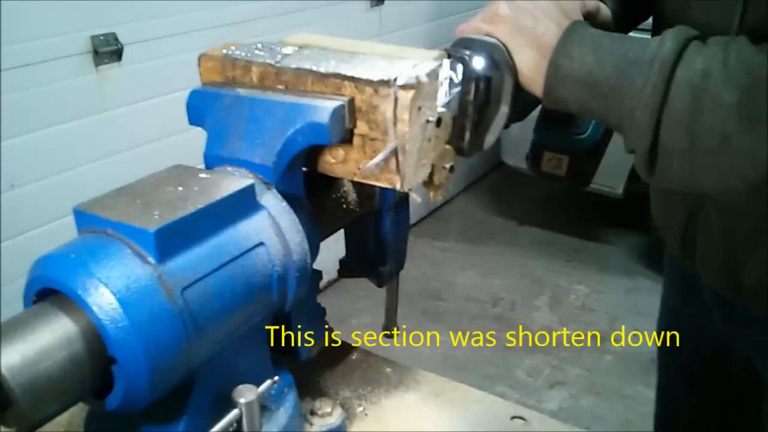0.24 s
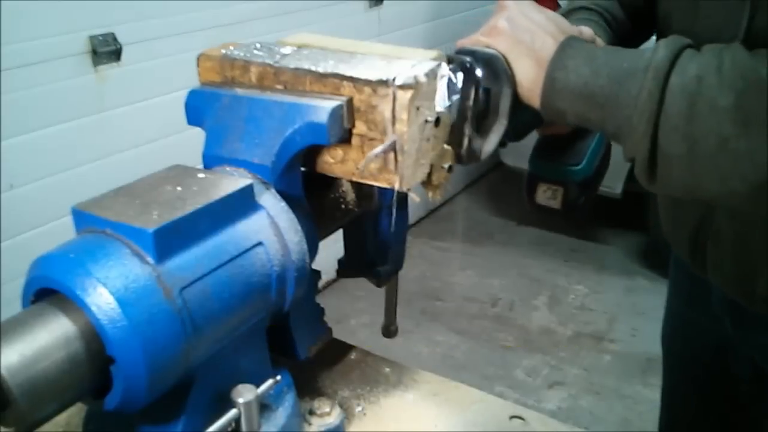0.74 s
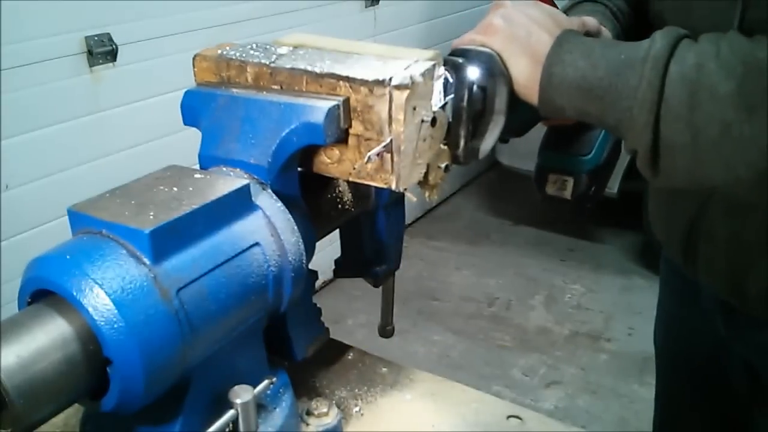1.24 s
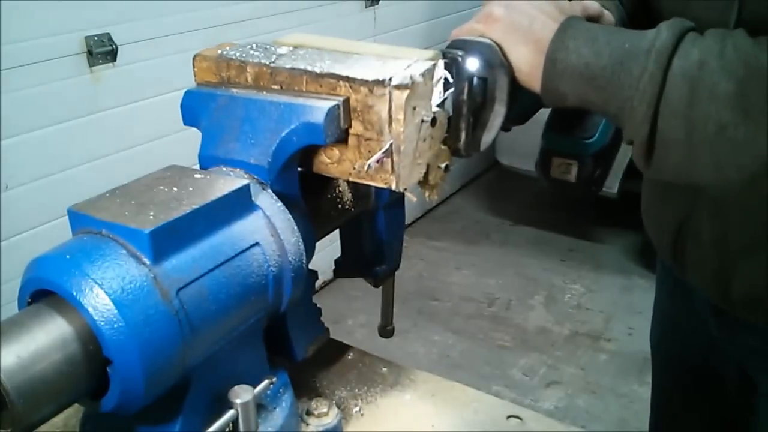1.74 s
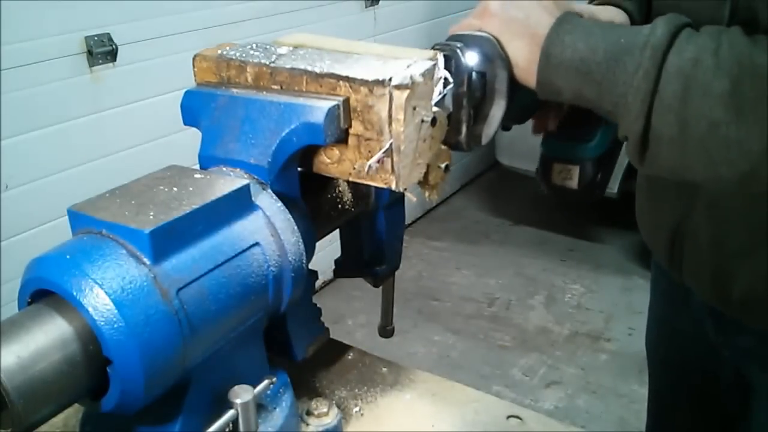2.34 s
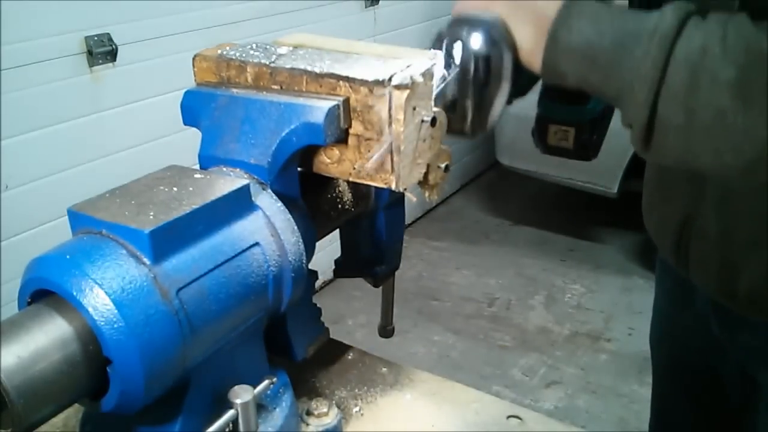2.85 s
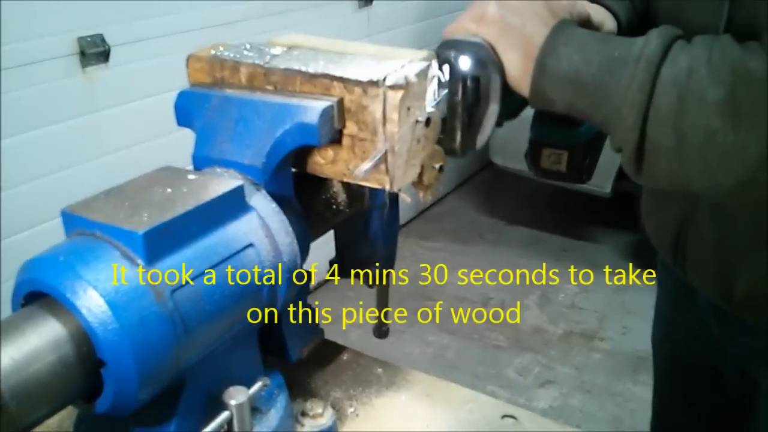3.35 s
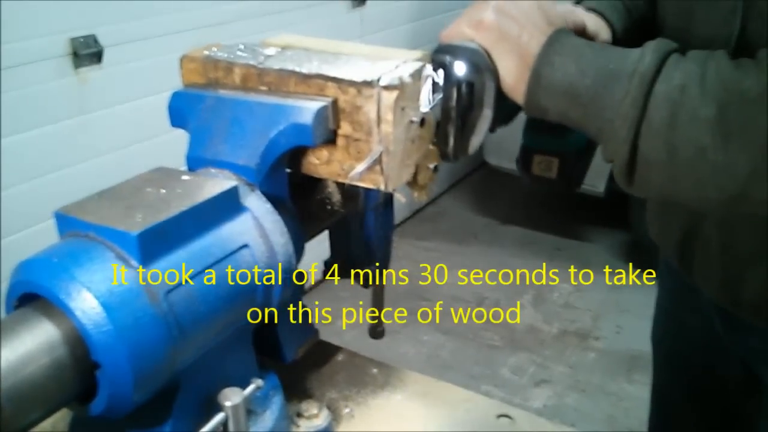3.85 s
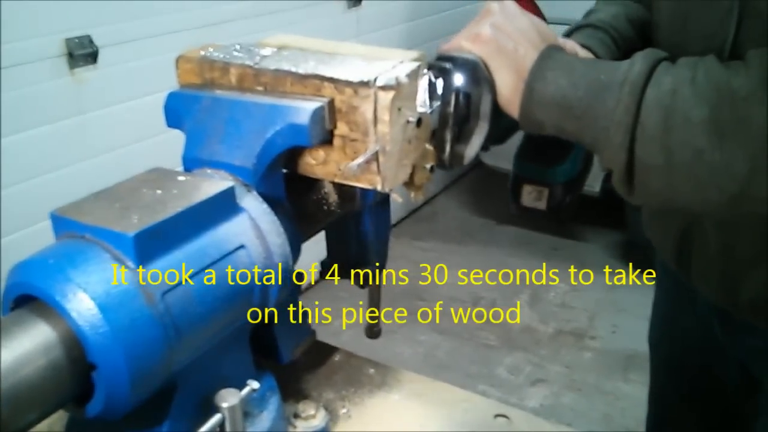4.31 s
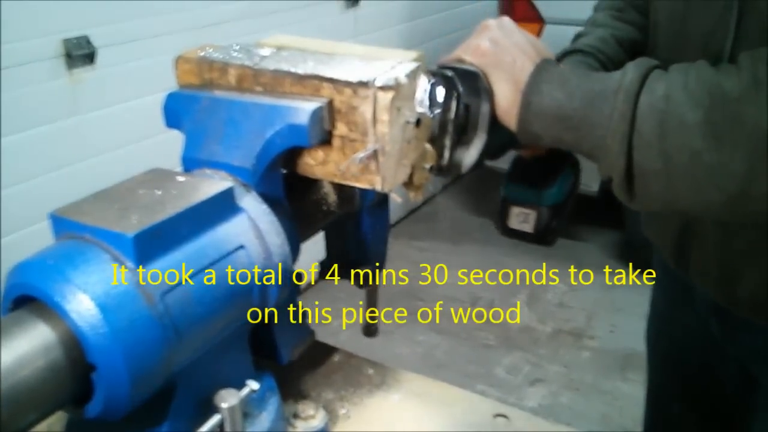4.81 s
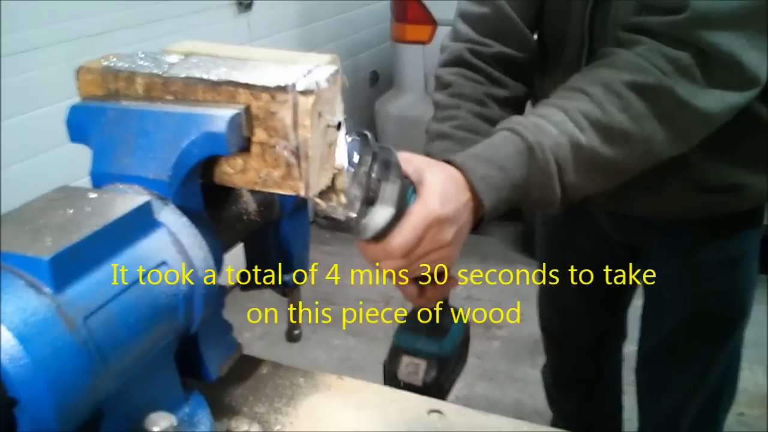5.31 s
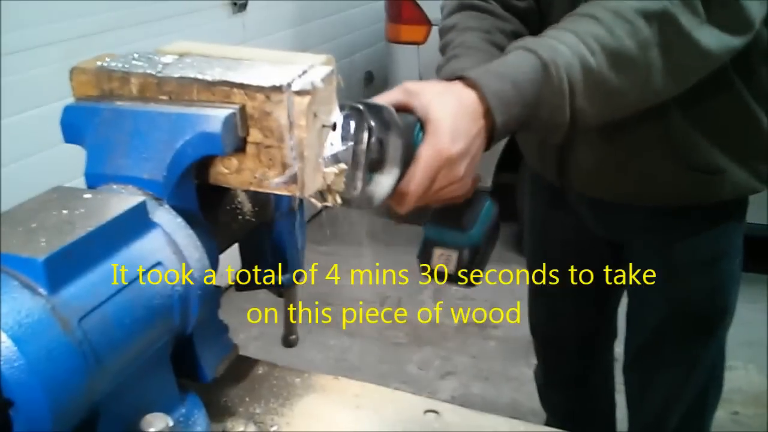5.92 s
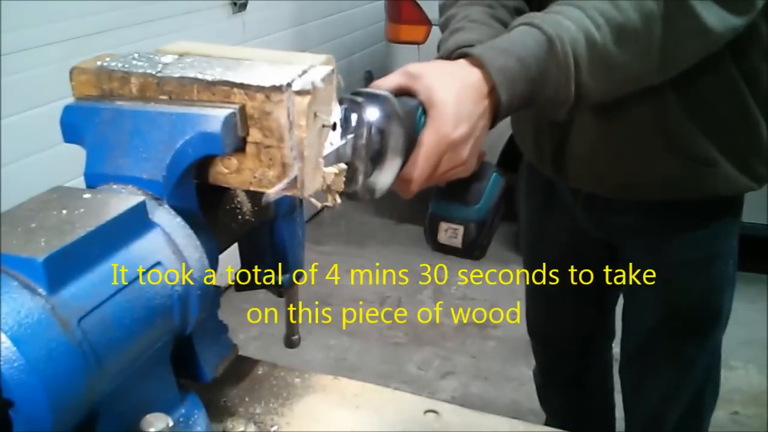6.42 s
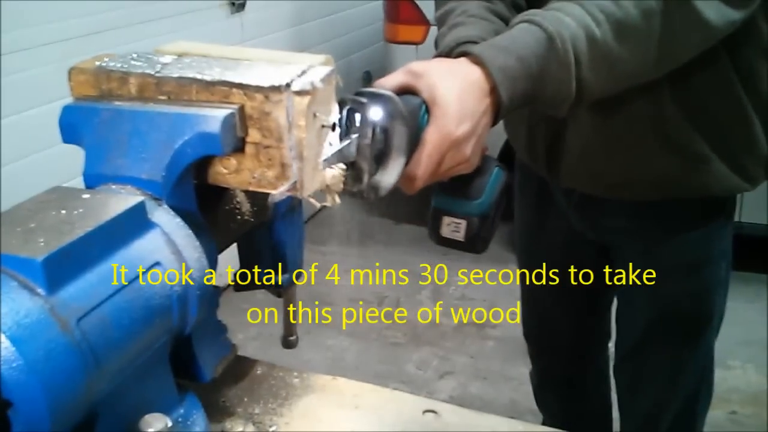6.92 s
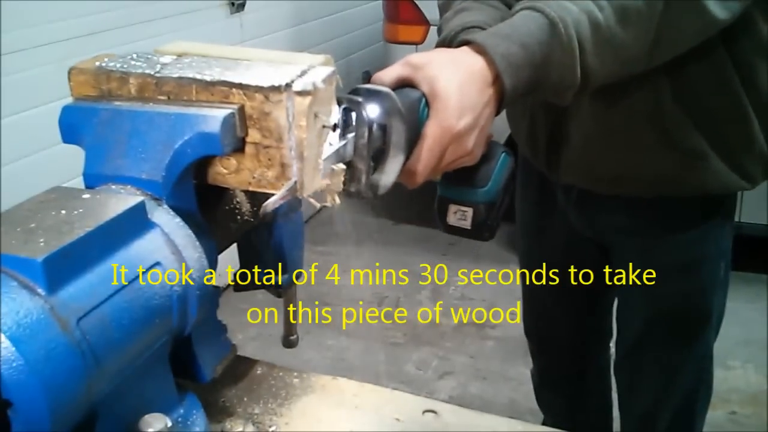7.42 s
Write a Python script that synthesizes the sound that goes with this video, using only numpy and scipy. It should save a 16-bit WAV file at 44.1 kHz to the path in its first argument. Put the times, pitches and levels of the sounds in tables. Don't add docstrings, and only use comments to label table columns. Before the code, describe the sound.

Already running, a power saw rasps wood and thumps the bench, bogs down and bangs to a stop. A short steely ring fades into quiet shop air with scattered small knocks, then harder clunks. The saw restarts abruptly and grinds to the end, straining and recovering, its blade squealing thinly on nails. Sound is dense, distorted and squashed flat, heard from the bench top with short room echoes.

```python
import sys
import numpy as np
from scipy import signal
from scipy.fft import rfft, irfft
from scipy.io import wavfile
from scipy.ndimage import uniform_filter1d, minimum_filter1d

SR = 44100
rng = np.random.default_rng(int(sys.argv[2]) if len(sys.argv) > 2 else 0)


def field_ratio(decibels):
    return 10 ** (np.asarray(decibels, dtype=float) / 20)


def dump_mix(stems):
    frames = np.atleast_2d(stems).T
    limited = np.clip(frames, -1, 1)
    pcm = np.round(limited * 32767).astype(np.int16)
    wavfile.write(sys.argv[1], SR, pcm)


N = 337806
JAM_S = 1.122

# time in seconds, speed in strokes per second.
SPEED = [
    [(0.0, 31.6), (0.49, 30), (0.84, 28), (1.1, 27.7)],
    [(3.06, 33.7), (3.44, 34.1), (3.69, 31.0), (4.06, 30.5), (4.26, 33.7), (4.76, 26.8), (5.17, 30.7),
     (5.72, 24.5), (5.95, 26.2), (6.27, 35.3), (6.51, 34.8), (6.78, 28.4), (6.96, 32.8), (7.65, 34.3)],
]
CRANK_STARTS = (.1, 55.0)
# time in seconds, pressure in dB, steel against wood in dB,
# share gated by the stroke from 0 to 1.
FEED = [
    [(0.0, -8.5, -15.5, 0.15), (.37, -15, -19.5, 0.5), (.6, -11.5, -18, 0.1), (.84, -12.5, -20.5, 0.4),
     (.95, -6, -18.5, 0.5), (1.066, -18, -8.5, 0.4)],
    [(2.69, -26, -8.5, .1), (3.0, -20, -8, 0.4), (3.15, 0.5, -10, 0.2), (3.4, -12.5, -12, 0.05),
     (4.25, -13, -10.5, 0.2), (4.55, -14.5, -12, 0.04), (5.15, -12.5, -5.5, 0.3), (5.9, -9.5, -7, 0.2),
     (6.1, -17, -20.5, 0.1), (6.5, -18.5, -16.5, .45), (7.15, -15, -16.5, .8), (7.65, -21, -12.5, 0.6)],
]
# frequency in Hz, level in dB per Hz.
TOP_CUT = [(130, -39), (230, -9.5), (681, -11), (907, -4), (1470, -13), (3550, -34), (7530, -16.5),
           (16000, -39)]
BOGGED_CUT = [(130, -36), (250, -5.5), (550, -14), (1090, -8), (1190, -13), (3180, -31.5), (7530, -20),
              (16000, -36)]
FRESH_CUT = [(130, -35), (220, -3.5), (706, -7.5), (907, 1), (1580, -4.5), (2350, -12.5), (7400, -1.5),
             (16000, -22)]
NAILED_CUT = [(130, -33), (220, -4.5), (693, -18.5), (924, -10), (2810, -25), (4170, -16.5), (6070, -19.5),
              (16000, -34.5)]
LOW_CUT = [(130, -45), (330, -20), (900, -6.5), (1420, -14), (2810, -31), (5600, -27.5), (7400, -23),
           (16000, -44.5)]
LAST_CUT = [(130, -43), (220, -19), (569, -2.5), (907, 3), (1400, -8.5), (2810, -25), (8540, -17),
            (16000, -38.5)]
# start in seconds, steel tick at the bite in dB,
# tick at the return in dB, colour of the cut.
POSITIONS = [
    (0, -18, 4.5, TOP_CUT),
    (.52, -23, -1.5, BOGGED_CUT),
    (2, -3.5, -26.5, FRESH_CUT),
    (4.7, -29, -21.5, NAILED_CUT),
    (5.998, -4.5, -4.5, LOW_CUT),
    (7.0, 6, -16.5, LAST_CUT),
    (7.52, 13.5, -5.5, LAST_CUT),
]
# level in dB, one a position.
FIZZ_DB = [10.6, 8, 0.87, 1.2, 4.1, 5.5, 8]
# frequency in Hz, width in Hz, level in dB.
WOOD = [(434, 29, -13), (585.6, 24, 4.5), (836.5, 79, -13.5), (1020, 64, -21), (1300, 24, -41),
        (1640, 110, 3), (2510, 76, -5.5), (4220, 150, -1.5)]
# level in dB, one a position.
PLATE_DB = [-30, -30, -30, -17, -7, -17, -19]
# frequency in Hz, width in Hz.
BENCH = [(63, 6.1), (96, 20), (138, 26), (176, 41)]
BRACING = [(-46.5, -15.5, -31, -19.5), (-34, -16.5, -13.5, -17), (-18, -18.5, -13.5, -18.5),
           (-14.5, -20.5, -17.5, -19), (-23.5, -22, -21, -24.5), (-32.5, -17.5, -30.5, -22),
           (-30, -22.5, -31, -21.5)]
# time in seconds, strength in dB,
# part of the bench leaned on in octaves above its second mode.
SHOVE = [
    [(0.0, 1.5, 0.015), (.6, -1, 0.46), (.84, 3, .52), (1.088, 3, 0.27)],
    [(3.0, -18.5, .01), (3.12, 3, 0.44), (3.6, -1.2, .1), (4.25, -2, 0.46), (4.45, -1.5, .2), (5.0, 2, .6),
     (5.15, -8, 0.87), (5.5, 1.5, -0.28), (5.62, 4.5, .2), (5.95, 11, 0.039), (6.4, -11, -.1),
     (6.75, 1.5, .52), (7.1, -9.5, 0.97), (7.65, -2, .1)],
]
# frequency in Hz, level in dB per Hz.
FLOOR = [(18, -44.5), (30, -11), (108, 0.5), (239, -10), (337, -18.5), (596, -14), (878, -32),
         (1290, -19.5), (3450, -37.5), (7000, -32.5), (9100, -66), (15400, -120)]
# frequency in Hz, t60 in seconds.
SHOP = [(100, 0.38), (500, 0.4), (2000, 0.3), (6000, 0.31), (12000, 0.28)]
# start in seconds, length in seconds, lower and upper blade ring in dB.
NAILS = [(.125, 0.13, -29.5, -31.5), (.87, 0.1, -29, -22), (1.085, .02, -27, -29),
         (3.05, 0.22, -32.5, -23.5), (4.22, 0.19, -20.5, -25), (4.551, 0.13, -31.5, -38),
         (4.76, 0.17, -21.5, -21), (5.04, 0.041, -12.5, -17.5), (5.14, 0.32, -14, -21),
         (5.3, .29, -10, -14.5), (5.75, .16, -14.5, -17.5), (6.94, 0.027, -17, -28.5)]
IDLE_RING_DB = (-41.5, -51.5)
# frequency in Hz, width in Hz, level in dB.
PAIRS = [
    [(6089, 16, 0), (6136, 16, -1)],
    [(9880, 22, 0), (10700, 20, -14)],
]
FREE_HZ = [6089, 6136, 9889, 10700, 14380]
# level in dB, t60 in seconds.
FREE_BLADE = [(-22, .3), (-15, .3), (-22, .19), (-22, .14), (-27, .13)]
# time in seconds, peak in dB, ring in Hz,
# bass above the peak in dB, looseness in dB.
KNOCKS = [(1.122, -2.5, 927, -11, -8), (1.414, -33, 427, -3, -37), (1.492, -41.5, 2040, 6, -26),
          (1.515, -33.5, 517, 2, -24.5), (1.549, -44.5, 5470, 9, -1.5), (1.583, -41, 566, 14, -3.5),
          (1.666, -11.5, 1640, 0, -19), (1.708, -24, 1170, -5, -6), (1.819, -35.5, 990, -18, -1.5),
          (1.866, -34, 1725, -29, -10.5), (2.131, -51, 1920, -9.5, -8.5), (2.167, -54, 473, -11.5, -21.5),
          (2.236, -37, 604, -18, -11.5), (2.263, -33, 557, -7, -30), (2.309, -48, 610, 0, -11),
          (2.35, -35.5, 587, -8.5, -10), (2.558, -40, 1720, -29, -8), (2.607, -45, 592, -18.5, -7),
          (2.671, -46.5, 550, 8, -3.5), (2.726, -12.5, 1140, -10, -7.5), (2.852, -0.5, 870, -10, -6.5),
          (2.872, -10, 910, 11, -22.5), (3.059, -0.5, 880, -10, -0.5)]


def evened(x):
    return x / np.sqrt(np.mean(x ** 2) + 1e-20)


def read(points, hz):
    f, value = np.transpose(points)
    return np.interp(np.log(hz + 1), np.log(f + 1), value)


def curves(tables, t):
    s, *columns = np.transpose(sum(map(list, tables), []))
    running = (t <= tables[0][-1][0]) | (t >= tables[1][0][0])
    return [np.interp(t, s, c) for c in columns], 1. * running


def wander(t, pace_s, count):
    rows = rng.standard_normal((count, 300))
    return np.array([np.interp(t / pace_s, np.arange(300), row) for row in rows])


def position(t):
    return np.searchsorted([row[0] for row in POSITIONS], t, "right") - 1


def resonate(x, hz, width):
    turn = np.exp(2j * np.pi * np.cumsum(hz * np.ones(len(x))) / SR)
    r = np.exp(-np.pi * width / SR)
    return 2 * (turn * signal.lfilter([1 - r], [1, -r], x / turn)).real


def steep(x, hz, width):
    return evened(resonate(resonate(x, hz, width), hz, width))


def modes(x, table):
    return sum((-1) ** k * field_ratio(db) * resonate(x, hz, width) for k, (hz, width, db) in enumerate(table))


def clicks(per_s, spread_db):
    size = field_ratio(spread_db * np.minimum(rng.exponential(1, N), 5)) * rng.choice([-1., 1.], N)
    return evened(size * (rng.random(N) < per_s / SR))


def blows(turns, at, uneven_db):
    passed = np.diff(np.floor(turns - at), prepend=-1).clip(0, 1)
    return evened(passed * field_ratio(uneven_db * rng.standard_normal(N)))


def stroke_turns():
    snag, snag_s = .025, .06
    creep_per_s = 9.9
    t = np.arange(N) / SR
    restart_s = SPEED[1][0][0]
    (speed,), running = curves(SPEED, t)
    speed = speed * (1 + snag * wander(t, snag_s, count=1)[0] * (t > restart_s))
    turns = np.cumsum(np.where(running > 0, speed, creep_per_s)) / SR
    second = t > SPEED[0][-1][0]
    return turns + np.where(second, CRANK_STARTS[1] - turns[round(restart_s * SR)], CRANK_STARTS[0])


def rasp_levels(t):
    spin_up_db, spin_up_s = -53, 0.013
    fizz_lag_db, fizz_lag_s = -23, .04
    first_steel_s, before_steel_db = .115, -21
    nail_fizz = 0.084
    (pressure, steel, _), running = curves(FEED, t)
    from_restart = abs(t - FEED[1][0][0])
    pressure = pressure + spin_up_db * np.exp(-from_restart / spin_up_s)
    fizz = np.array(FIZZ_DB)[position(t)] + before_steel_db * (t < first_steel_s)
    fizz += nail_fizz * (nails(t)[1] - IDLE_RING_DB[1])
    fizz += fizz_lag_db * np.exp(-from_restart / fizz_lag_s)
    return [pressure, pressure + steel, pressure + steel + fizz], running


def wood_body(wood, gated, turns, bite):
    knock = 0.65 * gated * blows(turns, at=bite + .08, uneven_db=5)
    body = modes(wood + knock, WOOD)
    shoe_slap = steep(blows(turns, at=bite + .04, uneven_db=4.5), 1423, 240)
    block_rock = steep(blows(turns, at=bite + .2, uneven_db=4.5), 920, 220)
    return body + 0.2 * gated * shoe_slap + 0.15 * gated * block_rock


def cut_colour(layers, over_db=3.0):
    hz, t, z = signal.stft(layers, SR, nperseg=256, noverlap=192)
    levels, running = rasp_levels(t)
    colours = field_ratio([read(row[3], hz) for row in POSITIONS]) * (hz > 200)
    colour = colours[position(t)].T
    band = np.searchsorted([2550, 6100], hz)
    power = np.array([(colour[band == k] ** 2).sum(0) for k in range(3)]) / len(hz)
    level = (field_ratio(np.array(levels) + over_db) / np.sqrt(power))[band] * running
    coloured = z[band, np.arange(len(hz))] * colour * level
    return signal.istft(coloured, SR, nperseg=256, noverlap=192)[1][:N]


def teeth(turns, bite=.76, back=0.068):
    back_db, fade = -3, 1.4
    time = np.arange(N) / SR
    since_bite, since_back = (turns - bite) % 1, (turns - back) % 1
    strength = field_ratio(2.2 * rng.standard_normal(400))[np.floor(turns - bite + 1).astype(int)]
    flare = np.exp(-fade * since_bite) + field_ratio(back_db) * np.exp(-fade * since_back)
    flare = evened(uniform_filter1d(flare * strength, size=130))
    gated = np.clip(1.64 * curves(FEED, time)[0][2], 0, 1)

    scrape = rng.standard_normal(N) + 0.83 * clicks(per_s=1500, spread_db=6.5)
    wood = scrape * (1 + gated * (flare - 1))
    steel = scrape * (1 + 0.53 * gated * (flare - 1))
    body = field_ratio(4) * wood_body(wood, gated, turns, bite)
    lifted = uniform_filter1d(1. * (since_bite > .66), size=120)
    rasp = (wood + body) * (1 - .88 * gated * lifted)

    place = position(time)
    shoe_ring = field_ratio(PLATE_DB)[place] * steep(steel, 4330, 330)
    _, bite_db, return_db, _ = zip(*POSITIONS)
    bite_tick = field_ratio(bite_db)[place] * np.exp(-9 * since_bite)
    return_tick = field_ratio(return_db)[place] * np.exp(-9 * since_back)
    fizz = evened(steel + scrape * strength * 2.5 * (bite_tick + return_tick))
    return cut_colour([rasp, steel + body + shoe_ring, fizz])


def thump_levels(t):
    lean_db, lean_octaves = 5.5, 0.25
    loose_db, loose_s = 4, .1
    (strength, lean), running = curves(SHOVE, t)
    braced = uniform_filter1d(np.array(BRACING, float)[position(t)].T, size=2001)
    octaves = np.log2(np.array(BENCH)[:, :1] / BENCH[1][0])
    leaned = lean_db * np.exp(-((octaves - lean) / lean_octaves) ** 2)
    return braced + strength + leaned + loose_db * wander(t, loose_s, count=len(BENCH)), running


def bench(turns, over_db=2.5, widen=1.71):
    levels, running = thump_levels(np.arange(N) / SR)
    shove = blows(turns, at=.2, uneven_db=1.8) + .26 * rng.standard_normal(N)
    running = uniform_filter1d(running, size=900)
    out = field_ratio(levels[0] - 3) * running * steep(shove, 33, 49)
    for k, (db, (hz, width)) in enumerate(zip(levels, BENCH)):
        out += (-1) ** k * field_ratio(db + over_db) * running * steep(shove, hz, widen * width)
    return out


def floor(level_db=-59.5):
    shape = field_ratio(read(FLOOR, np.fft.rfftfreq(N, 1 / SR)))
    return field_ratio(level_db) * evened(irfft(rfft(rng.standard_normal(N)) * shape, N))


def shop(x):
    taps = np.zeros(SR)
    at = np.arange(200, SR - 20, 20)
    taps[at + rng.integers(0, 20, len(at))] = rng.choice([-1., 1.], len(at))
    hz, t, z = signal.stft(taps, SR, nperseg=512)
    tail = signal.istft(z * field_ratio(-60 * t / read(SHOP, hz)[:, None]), SR, nperseg=512)[1]
    return signal.fftconvolve(x, tail / np.linalg.norm(tail))[:N]


def nails(t, rise_s=0.076, fall_s=0.1):
    start, length, *peaks = np.transpose(NAILS)[:, :, None]
    rise = 1 + (t - start) / rise_s
    fall = 1 + (start + length - t) / fall_s
    touch = np.clip(np.minimum(rise, fall), 0, 1)
    return [idle + ((peak - idle) * touch).max(axis=0) for idle, peak in zip(IDLE_RING_DB, peaks)]


def blade(over_db=3, knee_db=-27, damped=1.2):
    time = np.arange(N) / SR
    running = curves(SHOVE, time)[1]
    out = np.zeros(N)
    for db, pair in zip(nails(time), PAIRS):
        sunk_db = damped * np.maximum(knee_db - db, 0)
        ring = evened(modes(clicks(per_s=310, spread_db=2.5), pair))
        out += field_ratio(db + over_db - sunk_db) * running * ring
    jam = round(JAM_S * SR)
    t = np.arange(N - jam) / SR
    free = sum(field_ratio(db - 60 * t / t60) * np.sin(2 * np.pi * hz * t) for hz, (db, t60) in zip(FREE_HZ, FREE_BLADE))
    out[jam:] += free * np.minimum(t / 0.0045, 1)
    return out


def knocks(ring_t60=0.058, rattle_t60=0.15, crack_t60=0.077, bass_t60=0.076, bass_hz=112):
    crack_db = -5.5
    out, t = np.zeros(N), np.arange(12000) / SR
    for s, db, hz, bass_db, rattle_db in KNOCKS:
        noise = rng.standard_normal(len(t))
        sound = field_ratio(-6.5 - 60 * t / ring_t60) * steep(noise, hz, 0.12 * hz + 40)
        sound += field_ratio(rattle_db - 9.5 - 60 * t / rattle_t60) * steep(noise, 2000, 1100)
        sound += field_ratio(rattle_db + crack_db - 60 * t / crack_t60) * steep(noise, 5000, 3200)
        sound += field_ratio(bass_db - 13.0 - 60 * t / ring_t60) * steep(noise, 650, 500)
        thud = np.sin(2 * np.pi * bass_hz * t) * np.minimum(t / 0.0017, 1)
        sound += field_ratio(bass_db - 60 * t / bass_t60) * thud
        out[round(s * SR):][:len(t)] += field_ratio(db) * sound * np.minimum(t / 0.0012, 1)
    return out


def scene():
    turns, taps = stroke_turns(), knocks()
    saw = teeth(turns) + blade() + bench(turns)
    echoes = shop(field_ratio(-5.5) * saw + field_ratio(-8) * taps)
    return (saw + taps + echoes + floor())[None]


def low_pass(x):
    return signal.sosfilt(signal.butter(12, 15800, fs=SR, output="sos"), x)


def record(dry):
    peak = -minimum_filter1d(-abs(dry), size=161)
    limited = dry / np.maximum(uniform_filter1d(peak, size=161) / 1.305, 1)
    ceiling = .88
    clipped = ceiling * limited / (ceiling ** 4 + limited ** 4) ** (1 / 4)
    upper_middle = signal.butter(2, [2200, 4600], "bandpass", fs=SR, output="sos")
    band = signal.sosfiltfilt(upper_middle, clipped)
    echo = .62 * np.roll(band, 132, axis=1)
    return low_pass(np.clip(clipped + echo, -1, 1))


dry = scene()
out = record(dry)
dump_mix(out)
```